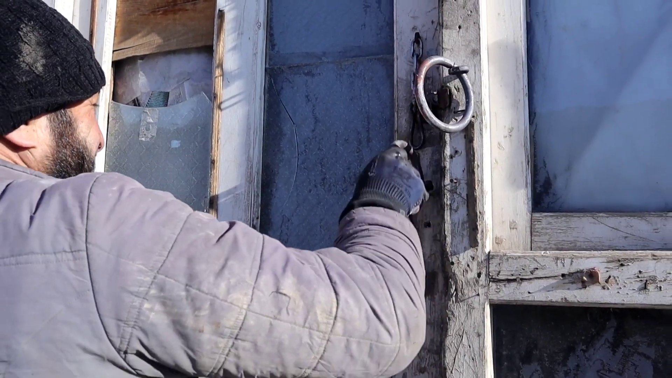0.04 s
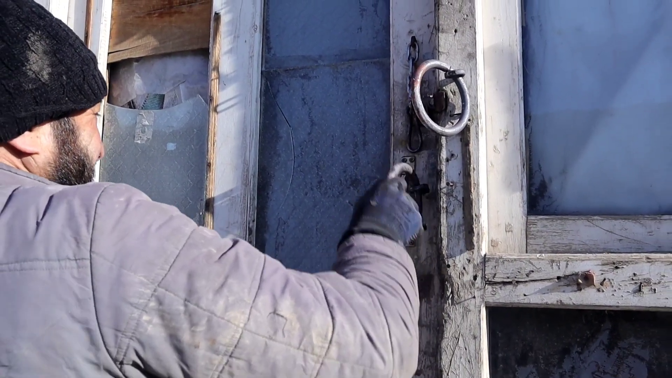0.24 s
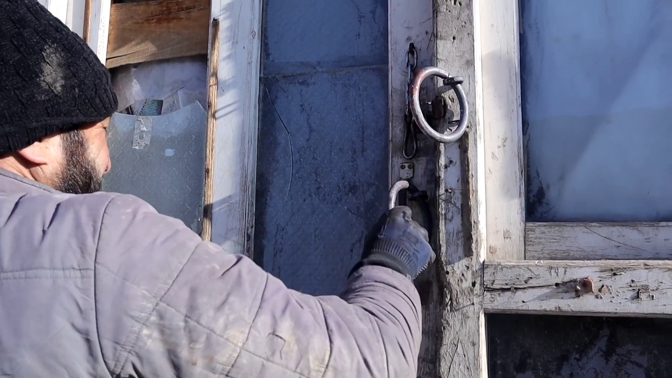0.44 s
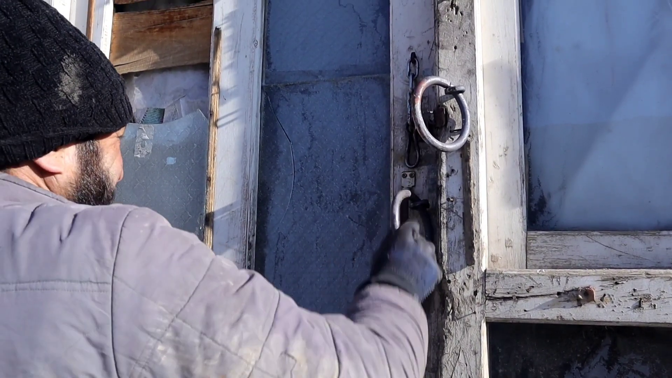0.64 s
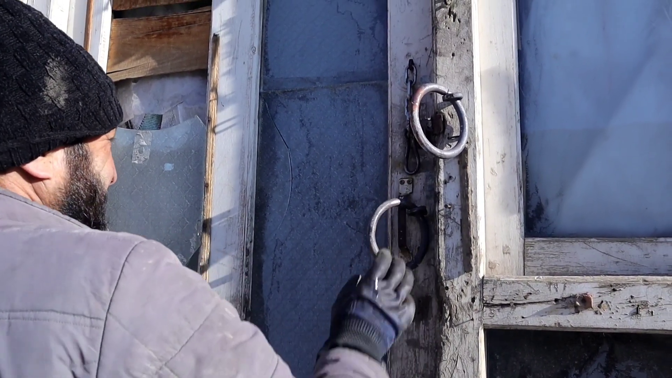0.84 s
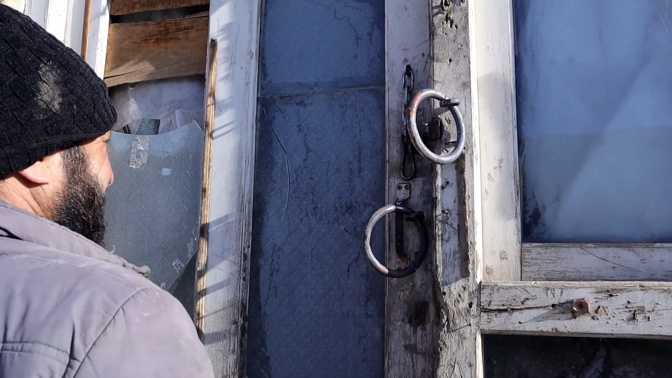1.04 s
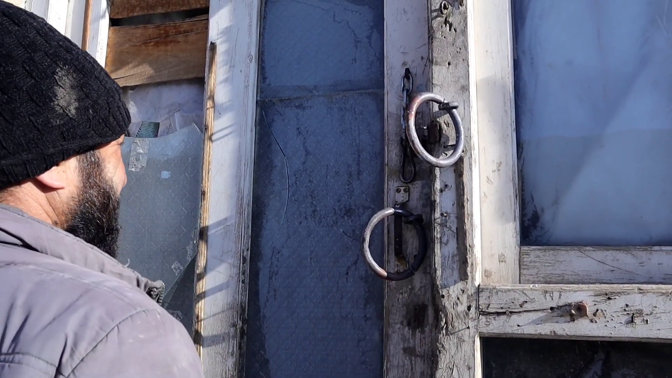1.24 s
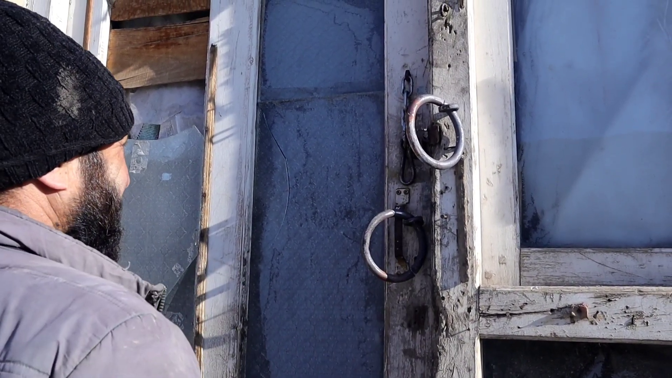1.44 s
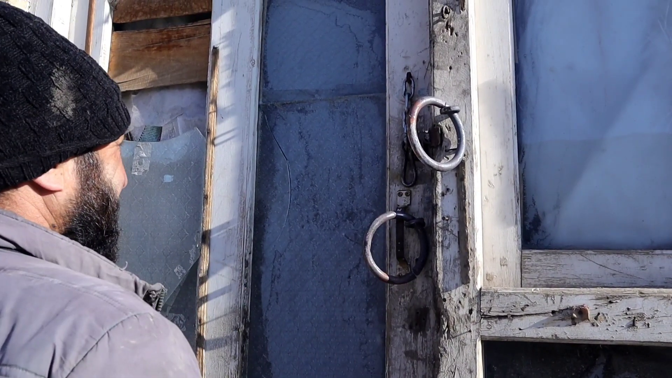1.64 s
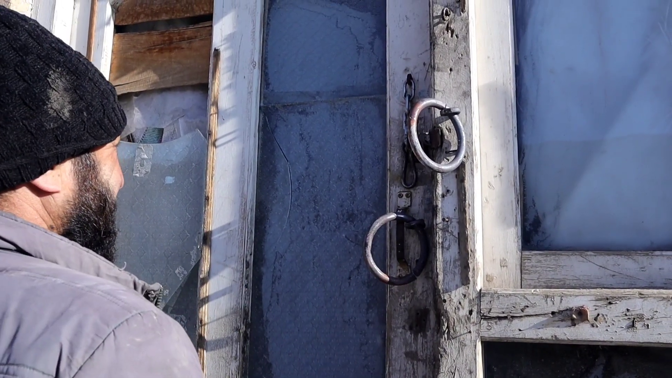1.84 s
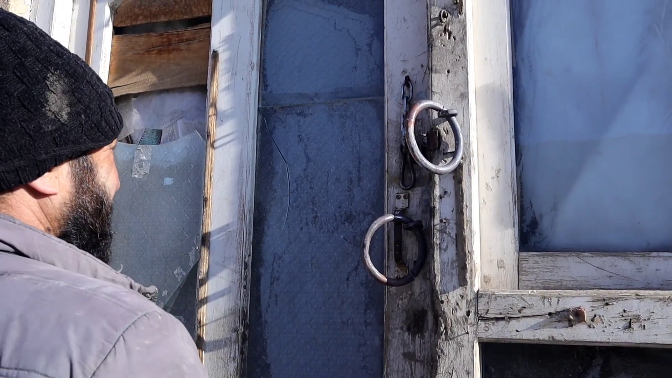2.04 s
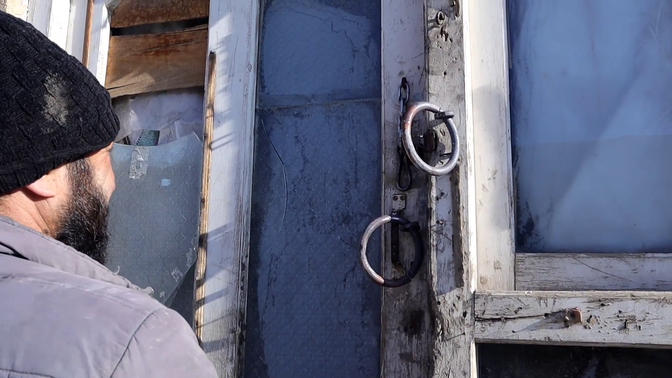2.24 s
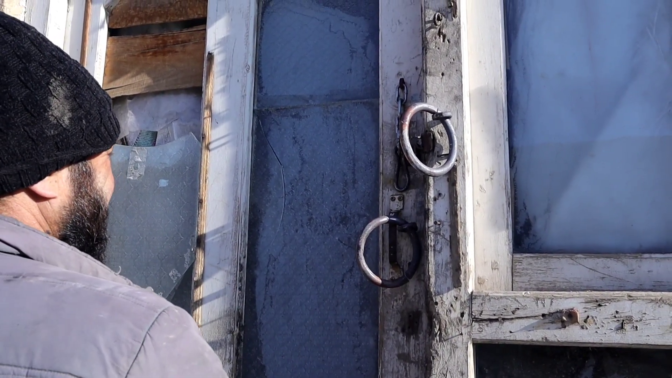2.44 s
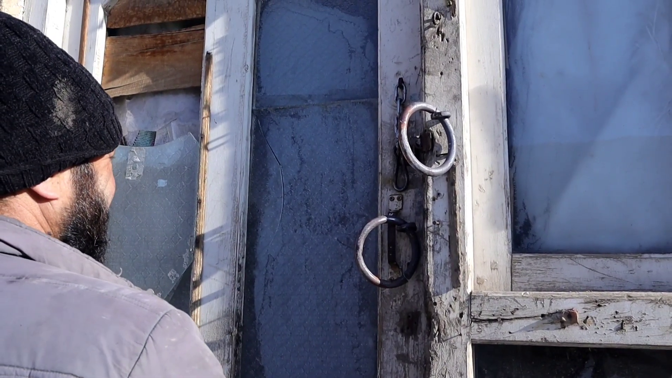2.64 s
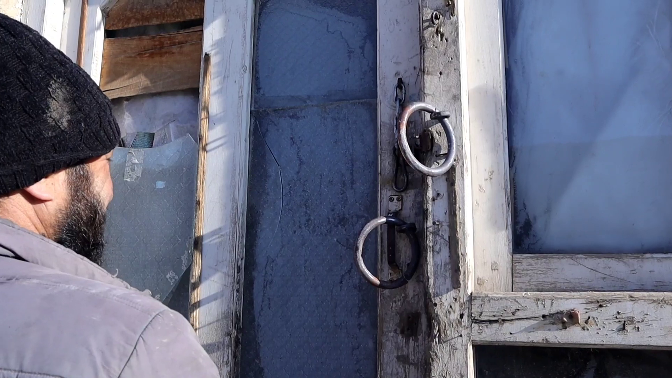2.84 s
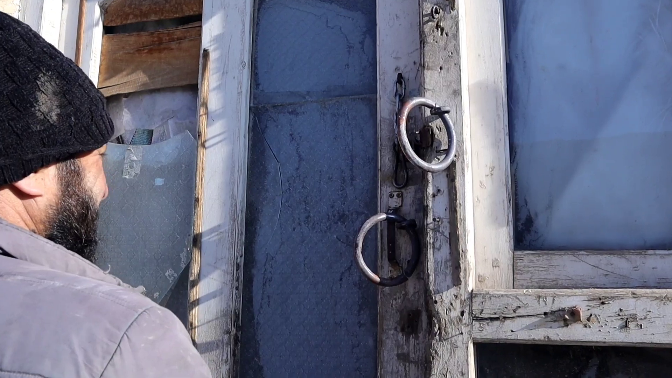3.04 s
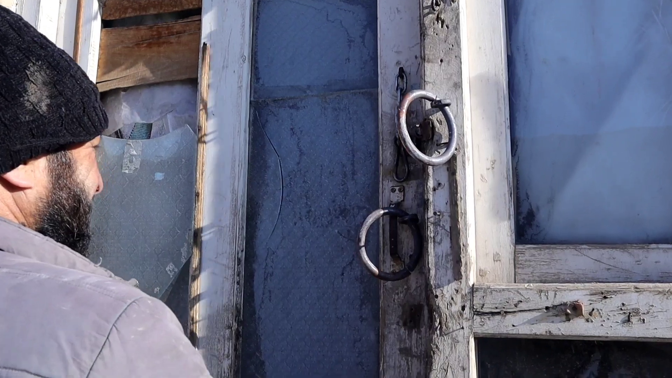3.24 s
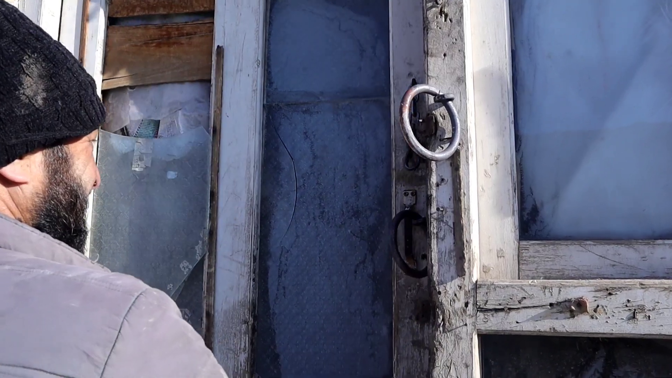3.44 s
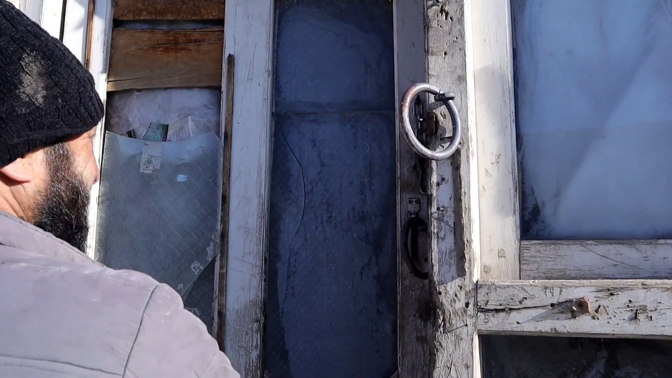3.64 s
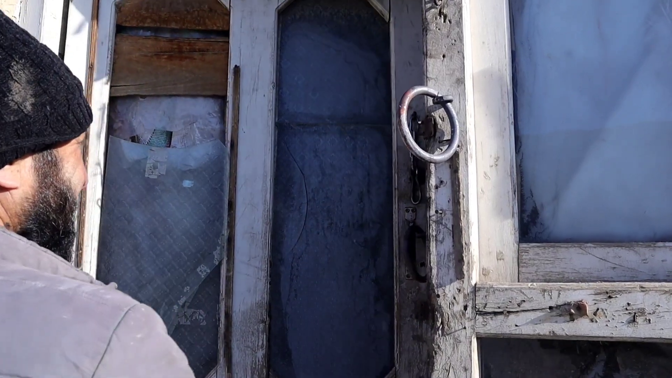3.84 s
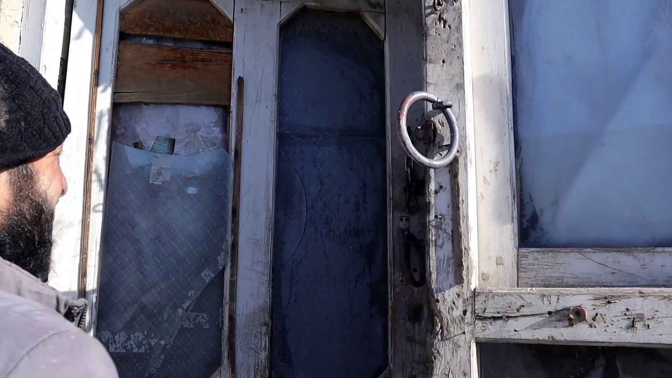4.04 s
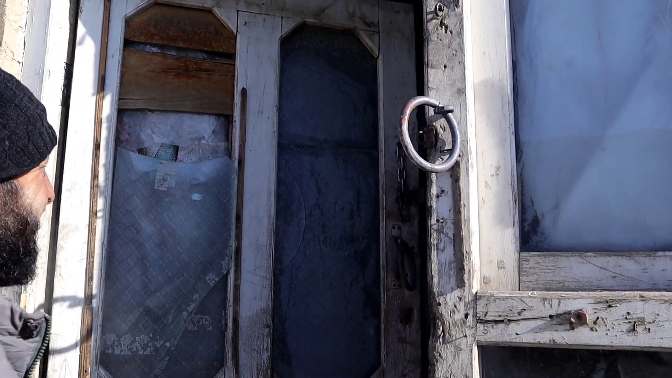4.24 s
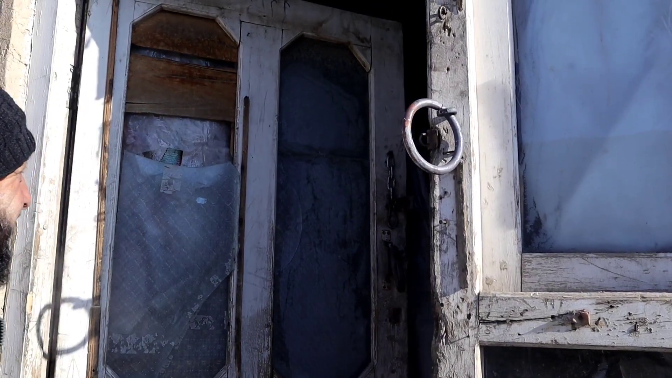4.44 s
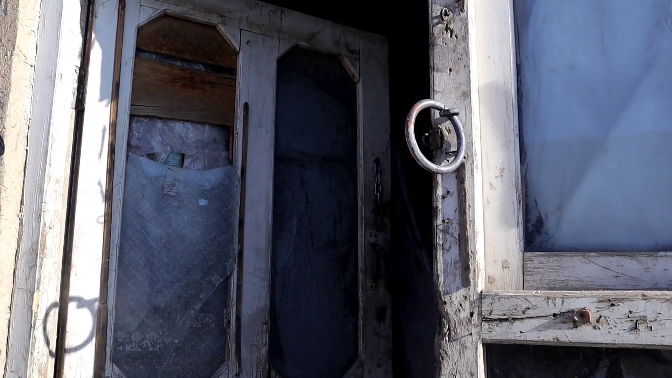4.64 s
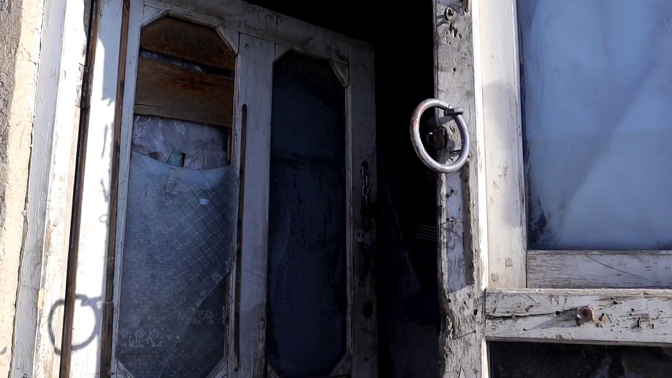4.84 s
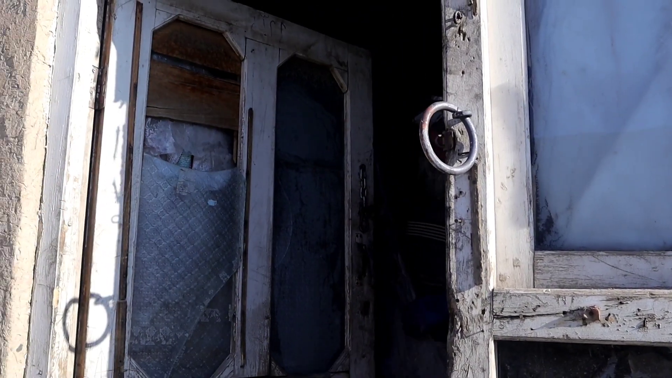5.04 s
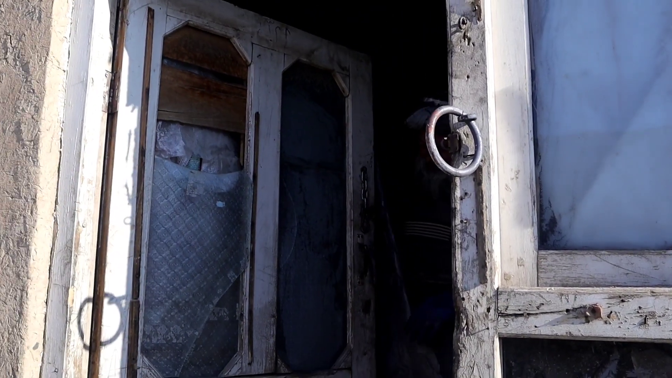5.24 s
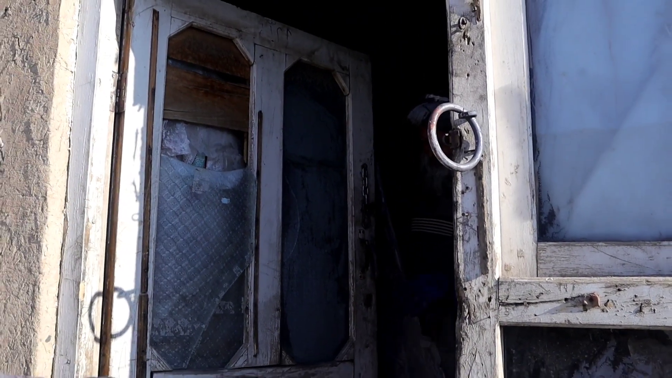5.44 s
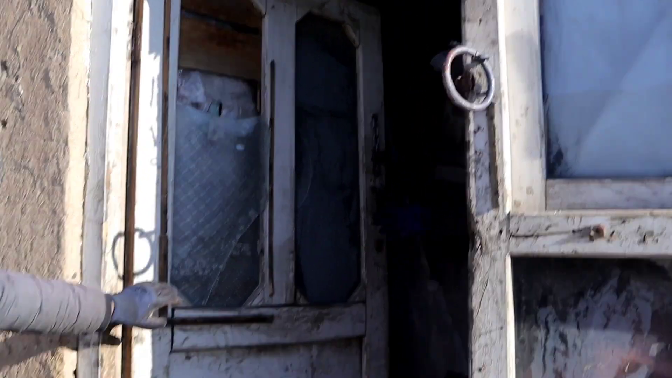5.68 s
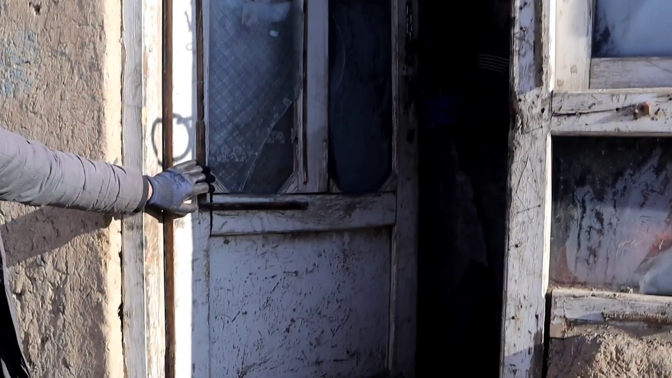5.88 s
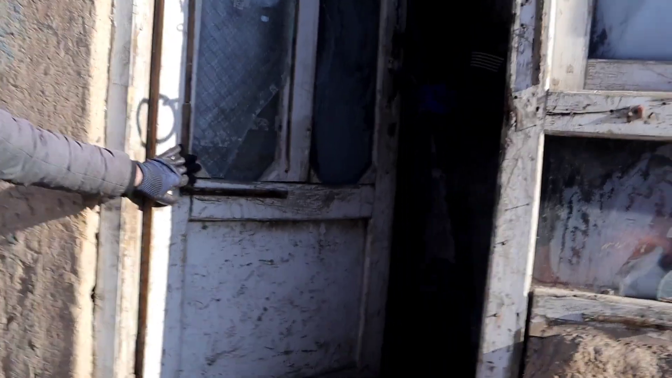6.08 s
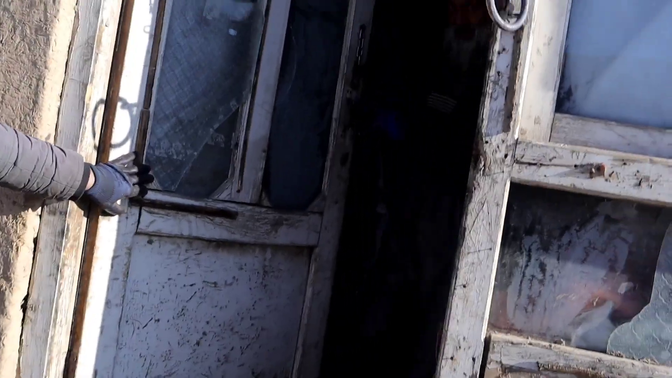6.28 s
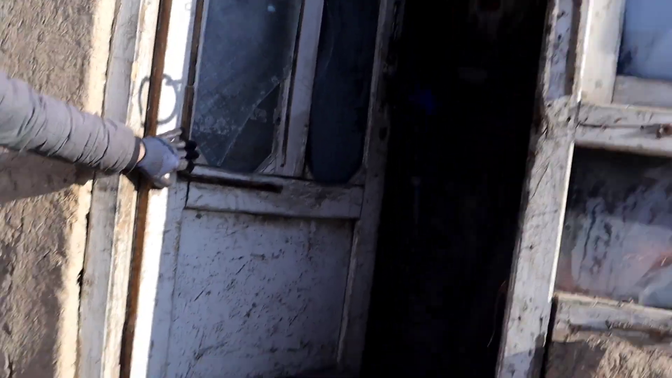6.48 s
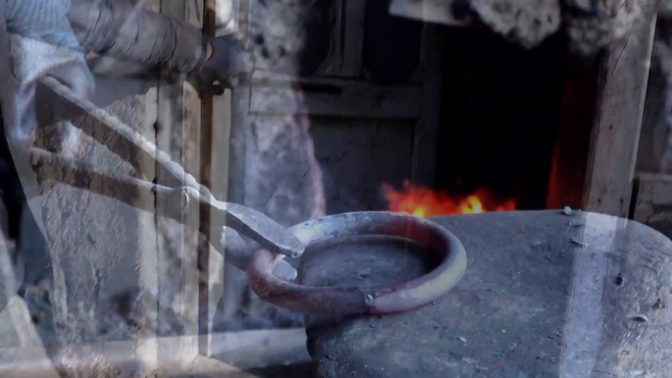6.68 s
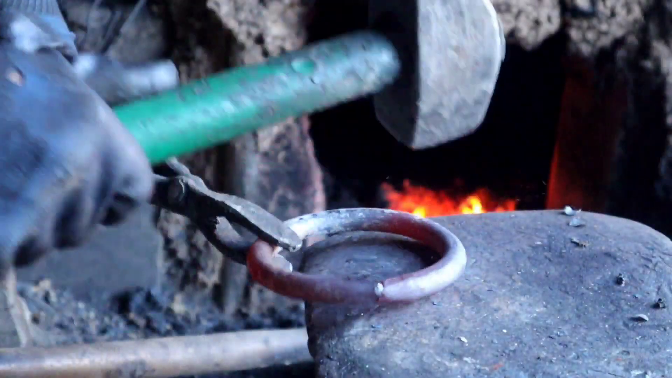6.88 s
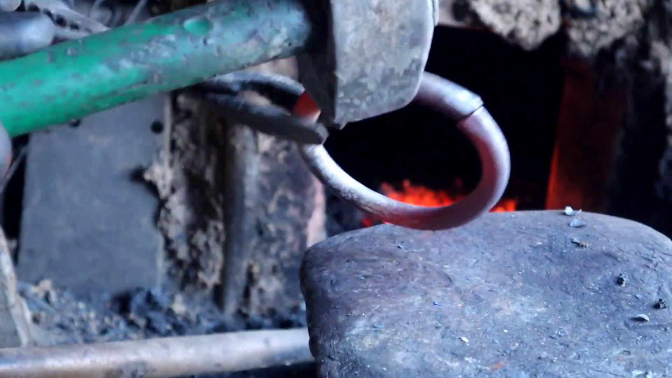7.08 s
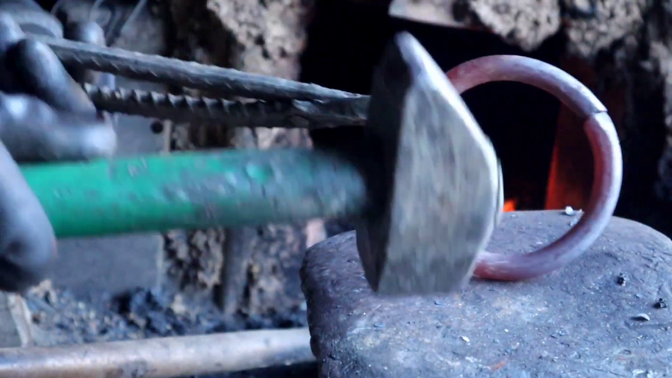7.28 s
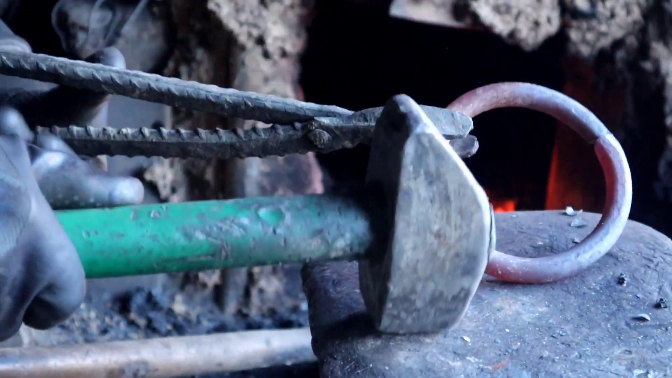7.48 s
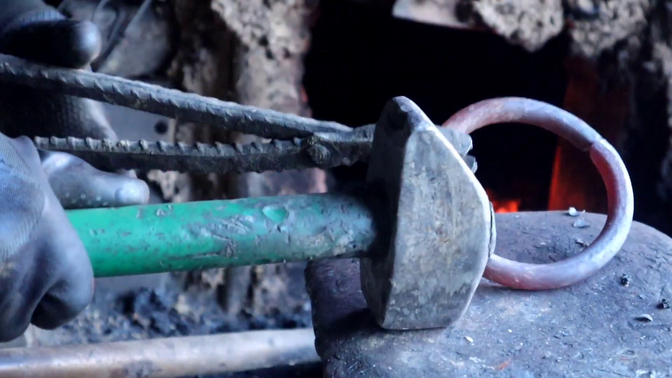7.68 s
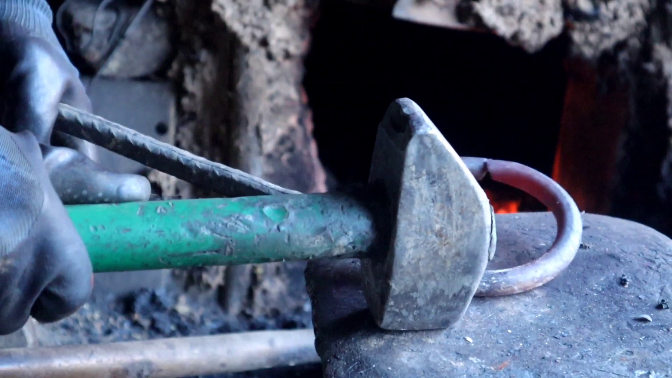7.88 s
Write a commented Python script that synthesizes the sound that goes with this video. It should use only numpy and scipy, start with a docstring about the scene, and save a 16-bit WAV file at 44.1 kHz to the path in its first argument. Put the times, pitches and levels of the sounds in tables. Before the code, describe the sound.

Outdoors, a nearby wooden door shakes under quick knocks from a clinking iron ring. After faint sparrow chirps, the door scrapes over its sill with hinge ticks and dull wooden bumps while a distant motorbike revs softly. Then a forge fire swells with a low blower hum. Tongs scrape and clink, and one hard hammer blow bounces on the anvil, which keeps ringing thinly.

```python
"""An iron ring is rattled against a loose wooden door, over outdoor murmur and low wind.
Sparrows chirp from 1.1 s; a motorbike revs far off from 1.8 s.
From 2.6 s the door is dragged open, scraping, ticking and thudding.
Then, from 6.4 s, a forge: the fire roars under its blower, tongs scuff the anvil,
and a hammer lands on it, bounces to rest and leaves it ringing."""
import sys
import numpy as np
from scipy import signal
from scipy.fft import rfft, irfft
from scipy.io import wavfile

SR = 44100
rng = np.random.default_rng(int(sys.argv[2]) if len(sys.argv) > 2 else 0)


def persist_wave(psi):
    """Save psi, clipped to +-1, as 16-bit WAV."""
    counts = np.round(np.clip(psi, -1, 1) * 32767).astype(np.int16)
    wavfile.write(sys.argv[1], SR, np.atleast_2d(counts).T)


N = 349272

AIR_SPECTRUM = [(32, -38.5), (55, -3.5), (143, -10), (204, -6), (380, -14.5), (428, -19), (471, -15.5),
                (1590, -26), (2220, -34), (15000, -46.5), (16500, -40)]  # outdoor murmur: freq_hz, density_db
AIR_LEVELS = [(0, -50.5), (1.4, -56.5), (3.3, -55.5), (4.6, -63), (5.2, -52), (5.8, -59.5), (6.4, -51.5),
              (7.92, -74)]  # murmur over time: time_s, level_db
# wind gusts: centre_s, level_db, width_s
GUSTS = [(.3, -64, .36), (2.01, -72, .15), (4.32, -71, .41), (5.8, -58, .3), (6.78, -58, .14),
         (7.92, -59, .12)]
ENGINE_REVS = [(1.8, 37.3, -72), (2.36, 76.3, -60), (2.5, 90.2, -59.5), (2.64, 92, -80), (3.2, 81.5, -66),
               (3.39, 100, -48), (3.55, 120.9, -57), (3.7, 151.8, -47), (4.51, 107.5, -53),
               (4.65, 112.2, -62), (4.86, 143.4, -48), (5.02, 160.8, -51), (5.28, 145.6, -47.5),
               (5.87, 108.8, -52), (6.15, 85.5, -61)]  # motorbike: time_s, firing_hz, level_db
CHIRPS = [(1.086, 0.0215, 3360, 6070, 3970, -60), (1.105, 0.026, 4000, 3310, 3850, -54.5),
          (1.093, 0.015, 3020, 3130, 3100, -56), (1.167, 0.012, 3700, 3300, 2750, -60),
          (1.168, 0.016, 4730, 5200, 5700, -65), (1.184, 0.046, 2940, 3800, 3040, -50.5),
          (1.196, 0.0194, 4700, 4750, 4000, -54), (2.45, .02, 3520, 3370, 3190, -69),
          (2.674, .022, 3100, 2950, 2620, -69), (2.688, 0.077, 3150, 3650, 3440, -63.5),
          (2.69, 0.1, 4200, 4340, 4250, -72), (2.762, .03, 3500, 3250, 2800, -70)]  # sparrow notes: start_s, length_s, start_hz, turn_hz, end_hz, level_db

KNOCKS = [(.002, -13, -23), (0.034, -8, -11), (0.227, -4, -18), (0.266, -5.5, -11), (0.46, -9, -26),
          (.473, -8.5, -19.5), (0.533, -5.5, -13), (.707, -8, -36), (.721, -12.5, -19), (.752, -6, -7.5)]  # ring on door: start_s, level_db, crack_rel_db
SHUDDERS = [(0.095, -39, .01), (0.133, -24.5, .016), (0.223, -38, 0.013), (0.354, -33, 0.0053),
            (0.38, -27, 0.013), (0.516, -29, 0.0094), (0.63, -26.5, 0.015), (0.779, -36.5, 0.037)]  # door shaking in its frame: centre_s, level_db, width_s
DOOR_MODES = [(108, 92, -7), (272.5, 90, -10), (610, 140, -10.5), (697, 200, -3.5), (1118, 170, -2),
              (1550, 120, -9), (1814, 37, 0.5), (1898, 33, -2), (2452, 42, -5.5), (2675, 80, -1),
              (3350, 143, -11), (3700, 230, -44.5), (9200, 200, -15)]  # door resonances: freq_hz, width_hz, gain_db
DOOR_SPECTRUM = [(50, -13.5), (100, 4.5), (300, 7.5), (1100, -6), (2000, -6.5), (4300, -6), (5300, -33),
                 (8000, -22), (11000, -41), (16000, -55.5)]  # broad response of the wood: freq_hz, gain_db
IRON_MODES = [(3220, -4, 0.045), (5170, -4.5, 0.028), (7460, -19.5, 0.15), (8700, -12.5, 0.085),
              (9100, -7.5, .1), (11160, -14, 0.056), (13900, -24.5, .08), (14500, -25.5, .06)]  # iron ring: freq_hz, gain_db, t60_s
CLINKS = [(.036, -33), (.135, -51), (.24, -46), (.27, -36), (.41, -47.5), (.48, -43), (.534, -32),
          (.67, -53.5), (.755, -41.5), (.9447, -40)]  # ring on its staple: start_s, level_db

DRAG_LEVELS = [(2.6, -97, -95), (2.71, -63.5, -78), (3.04, -62.5, -98), (3.29, -75, -77),
               (3.37, -43, -49.5), (3.45, -43.5, -67.5), (3.75, -50.5, -62.5), (4.27, -55.5, -60.5),
               (4.59, -55.5, -64.5), (5.05, -52.5, -56.5), (5.5, -59.5, -65), (6.23, -62, -67),
               (6.42, -53.5, -61.5), (6.6, -63, -62)]  # dragged door: time_s, scrape_db, grit_db
SCRAPE_SPECTRUM = [(71, -52.5), (120, 1), (281, 0), (475, -5), (524, -2), (1940, -11), (2250, -22),
                   (2480, -19.5), (6000, -83), (7800, -60), (13200, -120)]  # body of the scrape: freq_hz, density_db
GRIT_SPECTRUM = [(880, -53), (1500, 2), (1690, -1.5), (2140, 0), (3880, 1), (6120, -9), (11700, -15.5),
                 (16000, -36)]  # gritty treble: freq_hz, density_db
SILL_RUBS = [(2.964, -62.5, 0.037), (3.41, -51, 0.0068), (3.475, -55, 0.0087), (3.522, -49.5, 0.016),
             (3.569, -55, 0.018), (3.672, -50.5, 0.021), (3.748, -47, 0.028), (5.06, -61, 0.052)]  # door on its sill: centre_s, level_db, width_s
TICKS = [(0.9464, -37.5, 2000, -17), (1.5704, -49, 1600, -24.5), (2.711, -38, 1380, -26),
         (2.7377, -43.5, 1390, -28), (2.821, -36, 1400, -23), (2.865, -43.5, 1480, -26),
         (3.237, -51.5, 1336, -12.5), (3.3564, -31, 1418, -27), (3.3968, -29.5, 2360, -24),
         (3.6481, -49, 1100, -24), (3.6723, -54, 1280, -27), (3.72, -26, 1720, -6), (3.7687, -38, 1100, -6),
         (3.8317, -45, 3010, -20), (3.89, -42, 1600, -24), (3.914, -41.5, 2680, -10),
         (4.033, -36, 1650, -12), (4.0573, -46, 2455, -27), (4.1899, -37, 2390, 0.5),
         (4.3086, -52, 4500, -20), (4.353, -44.5, 1950, -23), (4.4054, -38, 2030, -0.5),
         (4.5064, -36.5, 2200, -28), (4.565, -45, 2390, -15), (4.584, -46, 1217, -14),
         (4.636, -40, 4800, -19), (4.6469, -38.5, 2006, -1), (4.69, -42, 2460, -28),
         (4.9771, -45, 1100, -2), (5.0272, -37, 1720, -19), (5.2777, -54, 1783, 4), (5.3453, -49, 4120, 6),
         (5.891, -38, 1159, -33), (6.22, -42, 1700, -12)]  # hinge and wood ticks: start_s, peak_db, pitch_hz, treble_rel_db
THUDS = [(3.355, -30, 468), (3.708, -24, 1200), (4.691, -39, 530), (5.655, -36, 942), (5.983, -42.5, 535),
         (6.135, -34, 567), (6.262, -40, 510), (6.333, -30.5, 390), (6.341, -33, 590), (6.36, -25, 1070),
         (6.401, -36.5, 1030), (6.456, -28.5, 1150), (6.471, -35.5, 1210), (6.657, -30.5, 1090)]  # dull knocks of wood: start_s, peak_db, pitch_hz
PANEL_BOOMS = [(2.712, -40.5), (4.35, -48), (5.69, -43.5), (5.781, -47), (5.917, -45), (6.14, -40),
               (6.218, -36.5)]  # door panel: start_s, peak_db
LATCH_MODES = [(2460, 1, 0.08), (2750, -1, 0.049), (4020, -8, 0.033), (9400, -16, 0.059), (10900, -24, .12)]  # iron latch: freq_hz, gain_db, t60_s
LATCH_PINGS = [(3.357, -35.5), (3.411, -33.5), (3.730, -54), (3.915, -42.5)]  # latch hits: start_s, peak_db

FIRE_LEVELS = [(6.4, -65, -73), (6.62, -50, -52.5), (6.76, -39.5, -46.5), (7.15, -36, -44.5),
               (7.46, -31.5, -44), (7.92, -39.5, -42.5)]  # blown fire: time_s, roar_db, hiss_db
ROAR_SPECTRUM = [(18, -40), (30, -68), (75, -1.5), (193, 2.5), (388, -8.5), (476, -6.5), (794, -9.5),
                 (879, -9.5), (1040, -12), (4000, -31.5), (5200, -51), (8800, -120)]  # fire roar: freq_hz, density_db
# blower hum at 83 Hz, its third harmonic, a broader roar near 190 Hz: freq_hz, width_hz, level_rel_db
BLOWER_HUM = [(83, 4, -5), (190, 18, -7), (251, 5, -5)]
HISS_SPECTRUM = [(880, 9), (1500, 4), (7690, 2.5), (7920, 1), (8570, 0), (9650, -2), (10100, -3),
                 (16000, -13.5)]  # fire hiss and tong scuffs: freq_hz, density_db
SCUFFS = [(6.595, -46.5, 0.016), (6.70, -45, 0.0052), (6.82, -41.5, 0.041), (7.12, -46, 0.0087),
          (7.21, -43, 0.04), (7.29, -33, 0.013), (7.385, -38, 0.035), (7.72, -38, 0.02),
          (7.815, -40.5, 0.013)]  # tongs on the anvil: centre_s, level_db, width_s
TONG_MODES = [(7440, 0.5, 0.023)]  # tong resonance: freq_hz, gain_db, t60_s
TONG_PINGS = [(6.801, -34), (7.706, -33.5)]  # tong hits: start_s, peak_db
BLOWS = [(6.80, -22.5, -44, -29.5, -75), (6.912, -24, 3, -3, -41.5), (7.291, -20, -46, -46, -72),
         (7.461, 0, -32, -19.5, -42), (7.5622, -6.5, -17, -33, -61), (7.6154, -6, -35, -40, -72),
         (7.6482, -14.5, -39, -45, -65), (7.6707, -19.5, -25, -47, -61), (7.686, -22, -34, -44, -70),
         (7.70, -25, -38, -46, -70), (7.71, -20, -42, -29, -63)]  # hammer and tongs on the anvil: start_s, clank_db, hoop_db, crack_db, ring_db
CLANK_MODES = [(433, -31, 0.036), (700, -45, 0.012), (1020, 2.5, 0.011), (1570, 8, 0.0036),
               (2200, 10, 0.0037), (3040, 16.5, 0.0022), (4100, 1, 0.0059)]  # short impact modes: freq_hz, gain_db, t60_s
ANVIL_MODES = [(8170.5, -6, 1.6), (8178, 1, 1.7), (9643, -1, 2.0), (11060, -15, .3)]  # long modes, the close pair beats: freq_hz, gain_db, t60_s


def from_db(db):
    """Decibels to gain."""
    return 10 ** (np.asarray(db) / 20)


def unit_rms(x):
    """Scale to rms 1."""
    return x / np.sqrt(np.mean(x ** 2) + 1e-20)


def lowpass(x, hz):
    """Second-order low-pass."""
    return signal.sosfilt(signal.butter(2, hz, "low", fs=SR, output="sos"), x)


def highpass(x, hz):
    """Second-order high-pass."""
    return signal.sosfilt(signal.butter(2, hz, "high", fs=SR, output="sos"), x)


def bandpass(x, hz, width_hz):
    """Resonance of peak gain 1."""
    r, w = np.exp(-np.pi * width_hz / SR), 2 * np.pi * hz / SR
    return signal.lfilter(np.array([1, 0, -1]) * (1 - r * r) / 2, [1, -2 * r * np.cos(w), r * r], x + 1e-18)


def ring(x, hz, t60_s):
    """One mode: a unit click starts a decaying sine of height 1."""
    r, w = from_db(-60 / (t60_s * SR)), 2 * np.pi * hz / SR
    return signal.lfilter([0, np.sin(w)], [1, -2 * r * np.cos(w), r * r], x + 1e-18)


def colour(x, spectrum):
    """Minimum-phase filter from rows of freq_hz, gain_db."""
    hz, db = np.transpose(spectrum)
    grid_hz = np.maximum(np.fft.rfftfreq(8192, 1 / SR), 1)
    cepstrum = irfft(np.interp(np.log(grid_hz), np.log(hz), db) * np.log(10) / 20)
    cepstrum[1:4096] *= 2
    cepstrum[4097:] = 0
    return signal.fftconvolve(x, irfft(np.exp(rfft(cepstrum))))[:len(x)]


def noise(spectrum):
    """Coloured noise, rms 1."""
    return unit_rms(colour(rng.standard_normal(N), spectrum))


def curves(rows, fade_s=.1):
    """A gate open over the table's span, then each column against time."""
    time_s, *columns = np.transpose(rows)
    t = np.arange(N) / SR
    gate = np.interp(t, [time_s[0] - fade_s, time_s[0], time_s[-1], time_s[-1] + fade_s], [0, 1, 1, 0])
    return [gate] + [np.interp(t, time_s, column) for column in columns]


def swells(rows, flatness=2.8):
    """Sum of bell-shaped gains; flatness squares their shoulders."""
    t = np.arange(0, N + 8, 8) / SR
    gain = sum(from_db(db) * np.exp(-np.abs((t - s) / width_s) ** flatness / 2) for s, db, width_s in rows)
    return np.interp(np.arange(N) / SR, t, gain)


def drift(rate_hz, hop=40):
    """Slow random wander, rms 1."""
    r = np.exp(-2 * np.pi * rate_hz * hop / SR)
    slow = signal.lfilter([1], [1, -2 * r, r * r], rng.standard_normal(N // hop + 2002))[2000:]
    return np.interp(np.arange(N) / hop, np.arange(len(slow)), unit_rms(slow))


def grains(per_s, spread_db):
    """Random clicks of uneven size, rms 1."""
    sizes = from_db(spread_db * np.minimum(rng.exponential(1, N), 4)) * rng.choice([-1, 1], N)
    return unit_rms(sizes * (rng.random(N) < per_s / SR))


def burst(t60_s, samples=8000):
    """Noise with instant onset and exponential decay."""
    t = np.arange(samples) / SR
    return rng.standard_normal(samples) * from_db(-60 * t / t60_s)


def add(out, sound, start_s, peak_db):
    """Mix in at a time and peak level."""
    part = out[int(start_s * SR):][:len(sound)]
    part += from_db(peak_db) * sound[:len(part)] / np.max(np.abs(sound))


def struck(hits, modes, spread_db):
    """Clicks ring the modes, with random strength per hit and mode."""
    start_s, hit_db = np.transpose(hits)
    scatter_db = rng.normal(0, spread_db, (len(hits), len(modes)))
    out = np.zeros(N)
    for k, (hz, db, t60_s) in enumerate(modes):
        clicks = np.zeros(N)
        clicks[(start_s * SR).astype(int)] = from_db(hit_db + db + scatter_db[:, k])
        out += ring(clicks, hz, t60_s)
    return out


def pings(hits, modes):
    """Short noise bursts jangle iron modes."""
    out = np.zeros(N)
    for start_s, peak_db in hits:
        jangle, scatter_db = burst(.036), rng.normal(0, 2.07, len(modes))
        partials = [from_db(db) * ring(jangle, hz, t60_s) for hz, db, t60_s in modes]
        add(out, from_db(scatter_db) @ partials, start_s, peak_db)
    return out


def murmur():
    """Outdoor noise of wavering level."""
    _, level_db = curves(AIR_LEVELS)
    return noise(AIR_SPECTRUM) * from_db(level_db + drift(6))


def wind(floor_db=-67.5, top_hz=50):
    """Low buffeting that swells in gusts."""
    rumble = lowpass(lowpass(rng.standard_normal(N), top_hz), top_hz)
    return unit_rms(highpass(rumble, 9.1)) * (from_db(floor_db) + swells(GUSTS))


def motorbike():
    """Distance leaves only the wavering firing tone."""
    gate, firing_hz, level_db = curves(ENGINE_REVS)
    phase = 2 * np.pi * np.cumsum(firing_hz * (1 + .0089 * drift(15))) / SR
    return gate * np.sqrt(2) * from_db(level_db + .5 * drift(7)) * np.sin(phase)


def sparrows(turn_share=.27):
    """Hoarse whistles glide through a turning pitch, smeared by yard echoes."""
    out = np.zeros(N)
    for start_s, length_s, start_hz, turn_hz, end_hz, db in CHIRPS:
        share = np.arange(0, length_s, 1 / SR) / length_s
        hz = np.interp(share, [0, turn_share, 1], [start_hz, turn_hz, end_hz])
        tone = np.sin(2 * np.pi * np.cumsum(hz) / SR) * signal.windows.tukey(len(share), .5)
        out[int(start_s * SR):][:len(tone)] += np.sqrt(2) * from_db(db) * tone
    out *= 1 + .5 * unit_rms(lowpass(rng.standard_normal(N), 300))  # hoarseness
    return out + from_db(-37) * signal.fftconvolve(out, burst(.15))[:N]


def fire():
    """Blown fire: roar, low blower hum and hiss."""
    gate, roar_db, hiss_db = curves(FIRE_LEVELS)
    roar = noise(ROAR_SPECTRUM)
    for hz, width_hz, db in BLOWER_HUM:
        roar += from_db(db + .54 * drift(9)) * unit_rms(bandpass(rng.standard_normal(N), hz, width_hz))
    return gate * (from_db(roar_db) * roar + from_db(hiss_db) * noise(HISS_SPECTRUM))


def tongs():
    """Iron scuffs the anvil in grainy swells and pings."""
    friction = unit_rms(colour(grains(per_s=7100, spread_db=4.3), HISS_SPECTRUM))
    return swells(SCUFFS) * friction + pings(TONG_PINGS, TONG_MODES)


def door_scrape():
    """Clumped stick-slip grains as the door drags on its sill."""
    gate, scrape_db, grit_db = curves(DRAG_LEVELS)
    rubs = swells(SILL_RUBS)
    scrape = unit_rms(colour(grains(per_s=3000, spread_db=3.26), SCRAPE_SPECTRUM))
    scrape *= from_db(1.18 * drift(15.7)) * (from_db(scrape_db) + rubs)
    scrape += from_db(-1) * bandpass(scrape, 296, 24)  # panel hum
    scrape += from_db(1) * bandpass(scrape, 2450, 80)  # loose latch
    grit = unit_rms(colour(grains(per_s=2500, spread_db=3), GRIT_SPECTRUM))
    grit *= from_db(1.32 * drift(42)) * (from_db(grit_db) + from_db(-7.5) * rubs)
    return gate * (scrape + grit)


def faint_ticks(count=18, start_s=3.8, end_s=5.95, low_hz=1100, high_hz=3500):
    """Random rows like TICKS while the door swings."""
    when, size, pitch, bright = rng.random((count, 4)).T
    time_s = start_s + (end_s - start_s) * when
    pitch_hz = low_hz * (high_hz / low_hz) ** pitch
    return list(zip(time_s, -53 + 8 * size, pitch_hz, -22 + 16 * bright))


def door_ticks(t60_s=.039):
    """Hinge and wood tick: a pitched snap plus a shorter treble one."""
    out = np.zeros(N)
    for start_s, db, hz, treble_rel_db in TICKS + faint_ticks():
        add(out, highpass(bandpass(burst(t60_s), hz, .51 * hz), 530), start_s, db)
        snap = bandpass(highpass(burst(t60_s / 2), 4500), 8500, 6100)
        add(out, lowpass(snap, 10700), start_s, db + treble_rel_db)
    return out


def door_thuds(t60_cycles=61):
    """Dull knocks of wood; lower ones last longer."""
    out = np.zeros(N)
    for start_s, db, hz in THUDS:
        force = burst(.015) + .81 * burst(t60_cycles / hz)
        wood = bandpass(force, hz, .27 * hz) + .35 * bandpass(force, 550, 700)
        add(out, lowpass(wood, 3300), start_s, db)
    return out


def panel_booms(pitch_hz=83.7, rise_s=.012):
    """One low mode of the door panel swells and dies."""
    out, t = np.zeros(N), np.arange(4000) / SR
    boom = np.sin(2 * np.pi * pitch_hz * t) * t * np.exp(-t / rise_s)
    for start_s, db in PANEL_BOOMS:
        add(out, boom, start_s, db)
    return out


def knocker(span_samples=2 * SR):
    """The ring cracks on the door and clinks on its staple; knocks and shudders drive the wood."""
    aftershakes = [(s + .033, db - 14, .039) for s, db, _ in SHUDDERS]
    force = swells(SHUDDERS + aftershakes, flatness=3) * grains(per_s=5000, spread_db=1.9)
    cracks = np.zeros(N)
    for start_s, db, crack_rel_db in KNOCKS:
        impact = burst(.032) + from_db(-3) * burst(.11) + from_db(-11.5) * lowpass(burst(.39), 1200)
        add(force, impact, start_s, db)
        add(force, lowpass(burst(.63, samples=30000), 900), start_s, db - 28.5)  # loose panels rumble on
        crack = burst(.011) + from_db(-13) * lowpass(lowpass(burst(.15), 9000), 9000)
        add(cracks, lowpass(highpass(crack, 3500), 10000), start_s, db + crack_rel_db)
    force = highpass(highpass(force[:span_samples], 65), 65)
    resonances = sum(from_db(db) * bandpass(force, hz, width_hz) for hz, width_hz, db in DOOR_MODES)
    wood = from_db(6) * colour(force, DOOR_SPECTRUM) + from_db(12) * lowpass(resonances, 3020)
    # each knock lands elsewhere and favours other modes
    hits = [(s, db - 30.5) for s, db, _ in KNOCKS]
    modes = [(hz, db, 1.4 / width_hz) for hz, width_hz, db in DOOR_MODES]
    ringing = lowpass(highpass(struck(hits, modes, spread_db=1.33), 70), 6900)
    clinks = struck(CLINKS, IRON_MODES, spread_db=2)
    return np.pad(wood, (0, N - span_samples)) + cracks + ringing + clinks


def hammer(echo_samples=500):
    """Clank, the hot hoop's dead clang, a crack and a slap from the walls; the anvil sings on."""
    out = np.zeros(N)
    for start_s, clank_db, hoop_db, crack_db, _ in BLOWS:
        contact_hz = 4350 + 79 * clank_db  # weaker blows land softer
        force = signal.unit_impulse(8000) + .16 * burst(.0077) + from_db(-30) * burst(.07)
        clank = sum(from_db(db) * ring(force, hz, t60_s) for hz, db, t60_s in CLANK_MODES)
        clank = lowpass(lowpass(clank, contact_hz), contact_hz)
        add(out, highpass(clank, 330), start_s, clank_db)
        hoop = ring(force, 1420, .014) + .8 * ring(force, 2250, .01)
        add(out, hoop, start_s, hoop_db)
        crack = burst(.009) + from_db(-10) * lowpass(burst(.08), 9000)
        add(out, lowpass(highpass(crack, 2800), 13000), start_s, crack_db)
    slap = signal.fftconvolve(bandpass(out, 1100, 1900), burst(.046))
    out[echo_samples:] += from_db(-29.5) * slap[:N - echo_samples]
    anvil_hits = [(s, ring_db) for s, *_, ring_db in BLOWS]
    return out + struck(anvil_hits, ANVIL_MODES, spread_db=0)


def scene():
    """Mono sum of all sources."""
    background = murmur() + wind()
    door = knocker() + door_scrape() + door_ticks() + door_thuds() + panel_booms()
    latch = pings(LATCH_PINGS, LATCH_MODES)
    return (background + door + latch + sparrows() + motorbike() + fire() + tongs() + hammer())[None]


def record(dry, threshold_db=-8, release_db_per_s=150, ceiling=.53, stopband_hz=16800):
    """Limiter, hard clip, steep low-pass."""
    release_db = release_db_per_s * np.arange(N) / SR
    over_db = np.maximum(20 * np.log10(np.abs(dry) + 1e-9) - threshold_db, 0)
    duck_db = np.maximum.accumulate(over_db + release_db, axis=1) - release_db
    duck_db = signal.lfilter([.01], [1, -.99], duck_db)  # 2 ms attack
    clipped = np.clip(dry * from_db(-duck_db), -ceiling, ceiling)
    return signal.sosfilt(signal.cheby2(10, 40, stopband_hz, fs=SR, output="sos"), clipped)


dry = scene()
out = record(dry)
persist_wave(out)
```